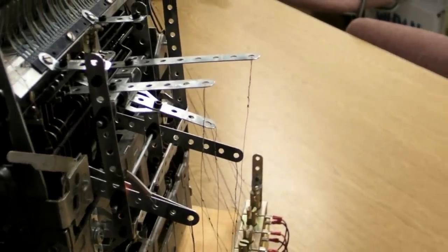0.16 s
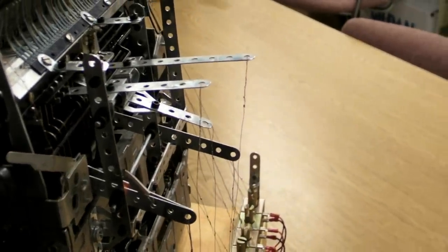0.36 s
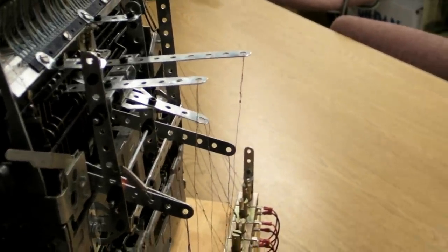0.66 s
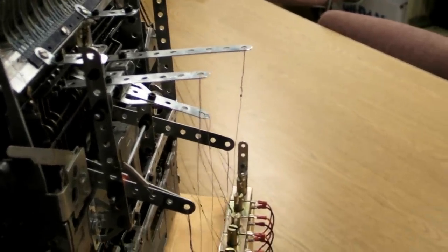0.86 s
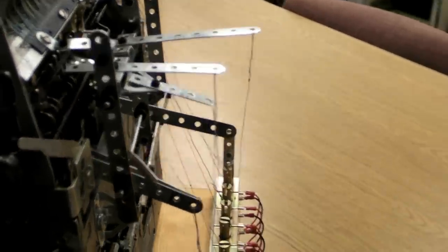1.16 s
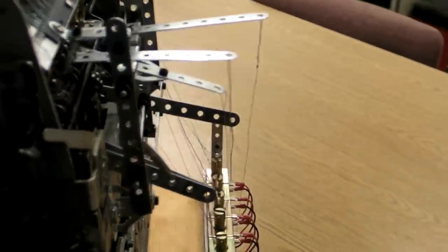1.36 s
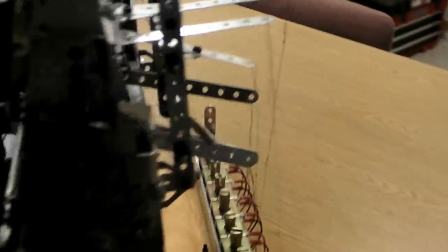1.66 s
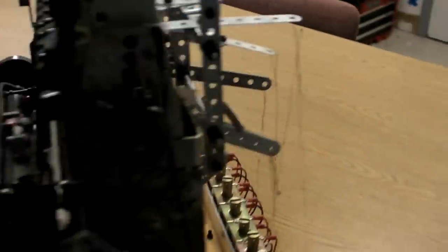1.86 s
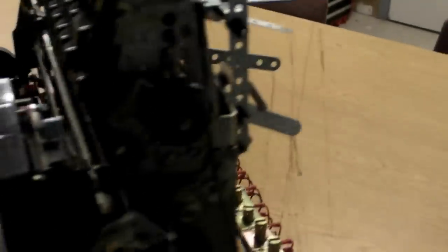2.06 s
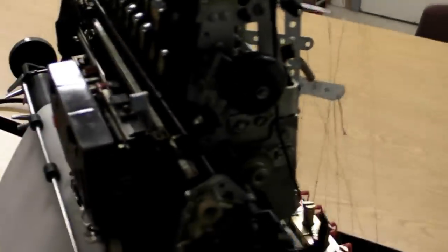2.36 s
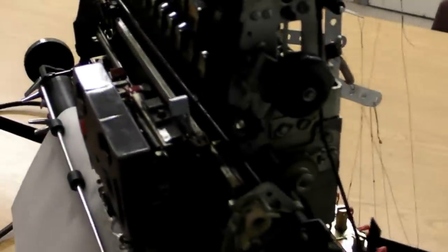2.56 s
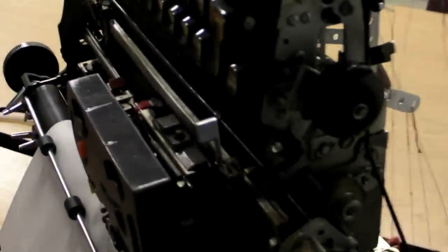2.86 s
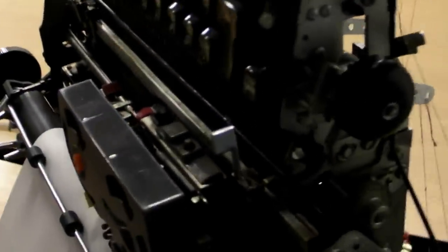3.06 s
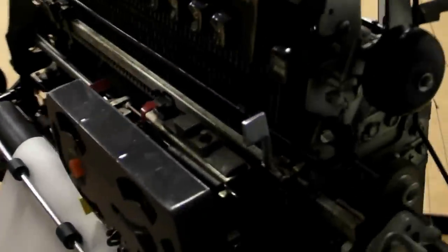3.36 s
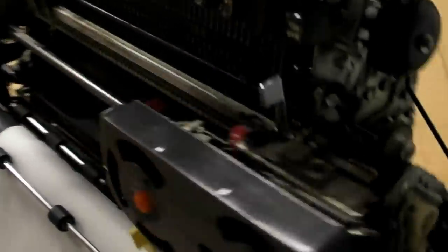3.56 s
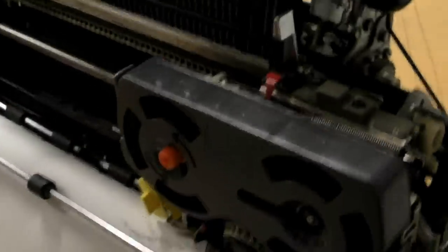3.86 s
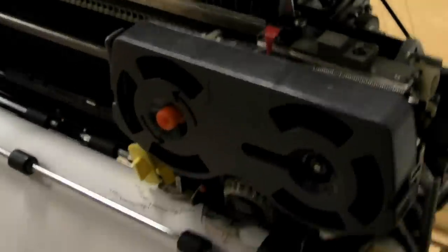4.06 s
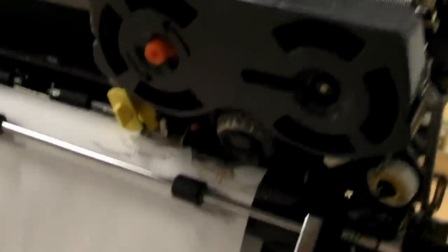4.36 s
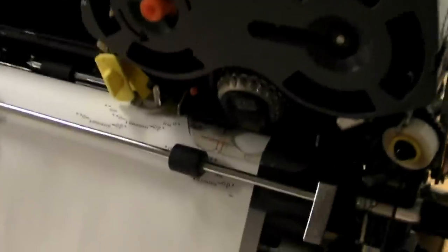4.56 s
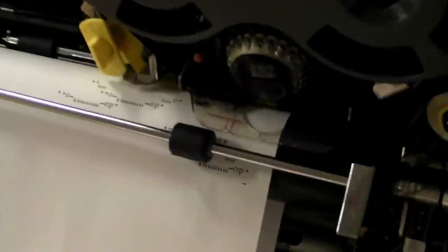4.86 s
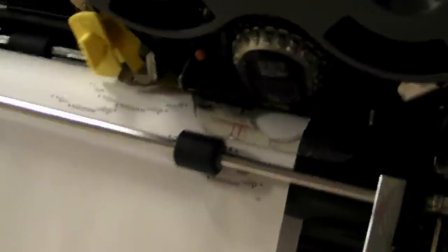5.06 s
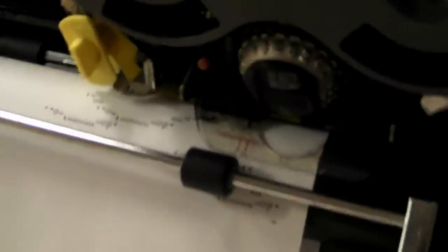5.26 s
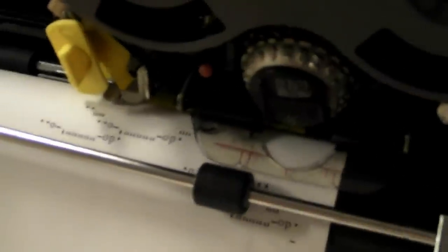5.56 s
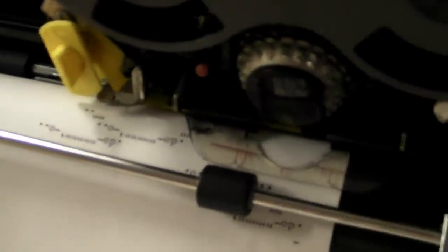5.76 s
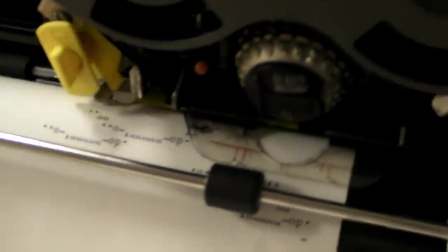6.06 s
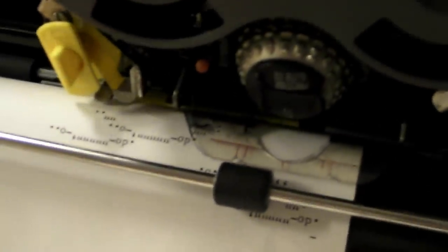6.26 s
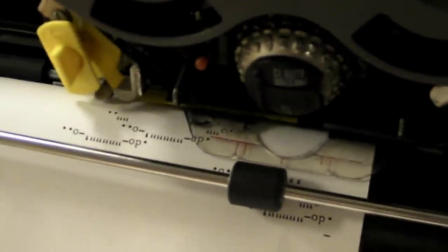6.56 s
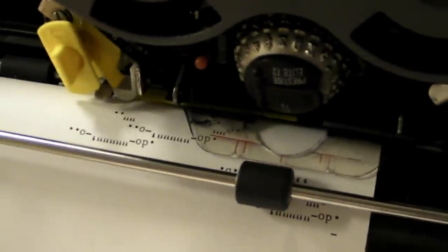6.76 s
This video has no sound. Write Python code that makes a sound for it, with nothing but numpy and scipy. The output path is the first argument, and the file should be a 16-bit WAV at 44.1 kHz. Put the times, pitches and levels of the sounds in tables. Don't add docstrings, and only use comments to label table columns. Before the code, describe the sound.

Hand-held close microphones begin beside a typewriter's metal levers and move round to its print head. Bright latch snaps and type blows repeat evenly, give way to irregular letters with clattering levers, then stop. A small motor hums and ticks, the carriage bangs home, and rapid regular typing resumes, harder and more ringing, over a faint table boom and short room tail.

```python
import sys
import numpy as np
from scipy import signal
from scipy.fft import rfft, irfft, next_fast_len
from scipy.io import wavfile
from scipy.ndimage import uniform_filter1d

SR = 44100
rng = np.random.default_rng(int(sys.argv[2]) if len(sys.argv) > 2 else 0)


def attenuation_scalar(level_db):
    decades = np.asarray(level_db, float) / 20
    return 10 ** decades


def int16_out(signal):
    q = np.round(np.clip(np.atleast_2d(signal).T, -1, 1) * 32767)
    wavfile.write(sys.argv[1], SR, q.astype(np.int16))


N = 305172
SIZE = next_fast_len(N + SR)
HZ = np.arange(SIZE // 2 + 1) * SR / SIZE + 1e-3
T = np.arange(N) / SR
TC = T[::64]
ARRIVE_S = 4.6


def level(x, db):
    return x * attenuation_scalar(db) / np.sqrt(np.mean(x ** 2))


def shape(table):
    hz, db = np.transpose(table)
    return attenuation_scalar(np.interp(np.log(HZ), np.log(hz), db))


def modes(table):
    return sum(attenuation_scalar(db) * 1j * HZ * w / (f ** 2 - HZ ** 2 + 1j * HZ * w) for f, w, db in table)


def through(x, gain):
    return irfft(rfft(x, SIZE) * gain, SIZE)[..., :N]


def add_at(out, start_s, sound):
    i = int(start_s * SR)
    out[..., i:i + sound.shape[-1]] += sound


def spell(start_s, end_s, rise_db_s, fall_db_s):
    return -rise_db_s * np.maximum(start_s - TC, 0) - fall_db_s * np.maximum(TC - end_s, 0)


def toned(table, low_db, high_db):
    return [(s, db, low_db - bright, high_db + bright, *rest) for s, db, bright, *rest in table]


def contacts(table, rise_ms, fall_ms, tail_db, tail_ms, gains_db, alike, click):
    lead = 512
    t = (np.arange(4096) - lead) / SR * 1000
    after = np.maximum(t, 0)
    crack = np.exp(-after / fall_ms) * (1 - attenuation_scalar(tail_db))
    buzz = attenuation_scalar(tail_db) * np.exp(-after / tail_ms)
    swing = np.where(t < 0, np.exp(t / rise_ms), crack + buzz)
    habit = rng.standard_normal(len(t))
    force = np.zeros((3, N + len(t)))
    for s, db, low, high, *_ in table:
        chance = np.sqrt(1 - alike ** 2) * rng.standard_normal(len(t))
        burst = swing * (click * (t == 0) + alike * habit + chance)
        gains = attenuation_scalar(db + np.add(gains_db, [low, 0, high]))
        add_at(force, s, gains[:, None] * burst)
    return force[:, lead:N + lead]


def grains(rate, spread_db, ms):
    size_db = spread_db * np.minimum(rng.exponential(size=N), 3)
    hit = (rng.random(N) < rate / SR) * attenuation_scalar(size_db)
    swell = signal.lfilter([1], [1, -np.exp(-1000 / (ms * SR))], hit)
    return level(rng.standard_normal(N) * swell, 0)


# time in seconds, peak in dB, brightness in dB.
REPEAT_SNAPS = [
    (0.0257, -5.5, 4),
    (0.2213, -5.5, 4.5),
    (0.4256, -4.5, 5.5),
    (0.6255, -5.5, 5),
]
LETTER_SNAPS = [
    (1.2944, -8.5, 8.7),
    (2.0205, -9.5, 4),
    (2.4445, -10, 5.5),
    (2.8694, -9.5, 2),
]
RESET_SNAPS = [
    (2.2522, -7.5, 5),
    (2.6764, -2, 3),
    (3.1085, -6.5, 1),
    (3.4552, -17.5, 15),
]
# mode in Hz, width in Hz, level in dB.
LATCH_BODY = [(830, 60, -6), (1580, 120, -4), (2510, 60, -2), (3400, 600, 12), (4700, 500, 8),
              (5900, 500, 5), (7670, 200, 2)]


def latch_snaps():
    hits = toned(REPEAT_SNAPS + LETTER_SNAPS + RESET_SNAPS, 6.5, -1.1)
    force = contacts(hits, rise_ms=0.3, fall_ms=1.1, tail_db=-21, tail_ms=45.0,
                     gains_db=[-9.0, -9.5, -6.0], alike=0.8, click=8)
    return [(force, LATCH_BODY)]


# time in seconds, peak in dB, brightness in dB.
STOP_SNAPS = [
    (4.1695, -3, 1),
    (4.2435, -14, -10),
]
FRONT_SNAPS = [(4.726, -5.5, 0.87), (4.9237, -4.5, 1.1), (5.1249, -5, 0.7), (5.3201, -5, 1.3),
               (5.5252, -4.5, 0.25), (5.7246, -5.5, -0.87), (5.9233, -4.5, -0.33), (6.1247, -4, -0.2),
               (6.325, -5, -1.5), (6.5249, -5.5, 0.81), (6.7252, -5, -0.62)]
# mode in Hz, width in Hz, level in dB.
CARRIAGE_BODY = [(856, 90, 5), (1090, 90, 4), (1420, 160, 4), (1750, 160, 3)]
FRONT_BODY = [(840, 60, 0), (1085, 100, 9), (1550, 180, 7), (1930, 120, 1), (2500, 90, 3), (2655, 45, 11),
              (7000, 700, 3)]


def stop_and_front_snaps():
    hits = toned(STOP_SNAPS + FRONT_SNAPS, -5.5, -5.0)
    force = contacts(hits, rise_ms=0.3, fall_ms=1.1, tail_db=-12.0, tail_ms=21.3,
                     gains_db=[-6.5, -6.0, -6.0], alike=0.8, click=8)
    front = T > ARRIVE_S
    return [(force * front, FRONT_BODY), (force * ~front, CARRIAGE_BODY)]


# time in seconds, peak in dB, pitch in Hz of the cam knock before.
FRONT_BLOWS = [(4.789, -15, 7500), (4.9907, -15, 1470), (5.1931, -15, 7600), (5.3828, -14.5, 1540),
               (5.5854, -15.5, 2950), (5.7871, -15, 4820), (5.9915, -15, 4720), (6.1933, -14.5, 2810),
               (6.3847, -15.5, 3070), (6.587, -16, 3200), (6.7907, -15, 3150)]
# mode in Hz, width in Hz, level in dB.
TYPE_BODY = [(1020, 130, 2), (3050, 260, 10), (5740, 400, 3), (6300, 400, 6)]


def type_blows():
    hits = [(s, db, -14.0, -3.0) for s, db, _ in FRONT_BLOWS]
    force = contacts(hits, rise_ms=0.34, fall_ms=1.0, tail_db=-0.5, tail_ms=7.0,
                     gains_db=[-4.0, -6.0, -3.0], alike=0.8, click=5.5)
    return [(force, TYPE_BODY)]


# time in seconds, peak in dB, brightness in dB.
RELEASES = [
    (0.8008, -5.5, 2),
    (1.5265, -9, 1.5),
]
# mode in Hz, width in Hz, level in dB.
CATCH_BODY = [(7000, 1500, 6.4), (8400, 1400, 14.6), (13500, 2800, 2.1)]


def catch_releases():
    bounce_s, bounce_db = 0.016, -8
    bounces = [(s + bounce_s, db + bounce_db, bright) for s, db, bright in RELEASES]
    hits = toned(RELEASES + bounces, 0.5, -1.5)
    force = contacts(hits, rise_ms=0.71, fall_ms=1.6, tail_db=-28.0, tail_ms=22.0,
                     gains_db=[-6.0, -6.0, -5.0], alike=0.38, click=4.0)
    return [(force, CATCH_BODY)]


# time in seconds, peak in dB, cam lead in ms, cam pitch in Hz.
REPEAT_BLOWS = [
    (0.0931, -13, 14.5, 5640),
    (0.2813, -13.5, 9.4, 2840),
    (0.486, -14.5, 13, 4840),
    (0.6886, -14, 11.3, 4080),
]
# time in seconds, peak in dB, pitch in Hz.
LETTER_BLOWS = [
    (1.3839, -10, 7500),
    (2.1223, -11, 3230),
    (2.5304, -11, 7100),
    (2.9521, -10, 2970),
]
# delay in seconds, level against it in dB, brightness in dB, pitch in Hz.
AFTER_REPEAT = [(0.016, -18, 0, 2460)]
AFTER_LETTER = [(0.033, -2.5, -4.5, 4070)]
AFTER_LETTER_BLOW = [(0.022, -8, 6.6, 3150)]
AROUND_FRONT = [(-0.02, -19.5, 2.2, 2380), (0.0155, -15, 8.8, 2640), (0.111, -41, 5, 2570)]
# time in seconds, #
# peak in dB, brightness in dB, pitch in Hz.
LEVERS = [(0.8364, -18, -8, 2950), (0.8752, -11.5, -11, 3330), (1.351, -13.5, -2, 5400),
          (1.401, -17, -2.5, 2870), (1.4582, -14, -7, 2790), (1.5617, -21, -10, 6040),
          (1.5852, -15.5, -4, 3200), (1.6006, -14, -8.5, 3300), (2.0665, -19, -5, 3090),
          (2.076, -18, -4, 3100), (2.0846, -21.5, 7, 5030), (2.105, -15, 5, 3900), (2.1144, -15, 8, 3380),
          (2.1905, -12.5, -5, 2790), (2.2479, -16.5, 5.5, 1680), (2.2834, -16.5, -12.5, 1760),
          (2.4934, -15.5, 2, 3330), (2.5476, -17.5, 11, 3220), (2.9188, -13.5, -2.1, 3170),
          (2.9262, -24, 10, 3640), (2.9593, -31, 9, 7180), (3.1498, -16.5, 3, 5900), (3.1557, -26, 3, 3400),
          (3.23, -15.5, -1.5, 3160), (3.238, -18, -7, 2470), (3.2617, -14, 8, 6100),
          (3.2705, -25, -10, 5900), (3.3014, -16.5, -12, 2280), (3.45, -11.5, 4.5, 4660)]
RETURN = [
    (3.7052, -36, 7.5, 7730),
    (3.8124, -40.5, 16, 3000),
    (3.9542, -42, 19, 3000),
    (4.051, -33.5, -16, 2040),
    (4.068, -20.5, 5, 3220),
    (4.0787, -17, -4.5, 2940),
    (4.188, -24.5, -18, 1610),
    (4.2131, -18.5, -2.5, 3500),
    (4.2638, -22, -14.5, 1340),
    (4.7407, -30, 9, 2660),
]


def knocks():
    pairs = [(REPEAT_SNAPS, AFTER_REPEAT), (LETTER_SNAPS, AFTER_LETTER),
             (LETTER_BLOWS, AFTER_LETTER_BLOW), (FRONT_SNAPS, AROUND_FRONT)]
    rows = []
    for events, rule in pairs:
        for delay, db, bright, hz in rule:
            rows += [(e[0] + delay, e[1] + db, bright, hz) for e in events]
    rows += [(s - 0.0088, db + 2.5, 4, hz) for s, db, hz in FRONT_BLOWS]
    rows += [(s - lead_ms / 1000, db - 1.5, 5.5, hz) for s, db, lead_ms, hz in REPEAT_BLOWS]
    rows += [(s, db, -3.0, 5900) for s, db, *_ in REPEAT_BLOWS]
    rows += [(s, db, 1.5, hz) for s, db, hz in LETTER_BLOWS]
    return toned(rows + LEVERS + RETURN, -8.5, -3.0)


# start in seconds, end in seconds, rattle in dB, air-band part in dB.
MOTION = [
    (0.0, 0.99, -22.5, -5),
    (1.42, 1.681, -16, -5),
    (2.103, 3.49, -17.5, -6),
    (4.118, 4.28, -48, -5),
    (4.72, 7.0, -23.5, -2.5),
]


def rattle():
    start_db_s, settle_db_s, dull_db_s, rest_db = 296, 140, 62, -35.5
    chatter = grains(2600, 5.5, 1.6) * attenuation_scalar(-16)
    body, air = attenuation_scalar(rest_db), attenuation_scalar(rest_db - 4.5)
    for start, end, db, air_db in MOTION:
        body = body + attenuation_scalar(db + spell(start, end, start_db_s, settle_db_s))
        air = air + attenuation_scalar(db + air_db + spell(start, end, start_db_s, settle_db_s + dull_db_s))
    drive = 0
    for snaps, blows, db in [(REPEAT_SNAPS, REPEAT_BLOWS, -15), (FRONT_SNAPS, FRONT_BLOWS, -18)]:
        for snap, blow in zip(snaps, blows):
            drive = drive + attenuation_scalar(db + spell(blow[0], blow[0], 94, 216)) * (TC > snap[0])
    body = np.interp(T, TC, body + drive)
    air = np.interp(T, TC, air + attenuation_scalar(-0.5) * drive)
    return np.array([body, body, air]) * chatter


# mode in Hz, width in Hz,
# level in dB.
BACK_BODY = [(913, 18, -14.5), (1610, 15, -75), (2490, 22, -14), (3300, 1300, -3), (4750, 110, -16),
             (6300, 53, -46), (7480, 480, 1)]
SPRING_BODY = [(2500, 50, 3), (2655, 40, 9)]


def loose_parts():
    force = rattle() + contacts(knocks(), rise_ms=1.7, fall_ms=2.4, tail_db=-1.5, tail_ms=16.6,
                                gains_db=[-4.0, -4.0, -4.0], alike=0.31, click=2.0)
    front = T > ARRIVE_S
    return [(force * ~front, BACK_BODY), (force * front, SPRING_BODY)]


# frequency in Hz, density in dB per Hz.
METAL = [(180, -18), (300, -1.5), (343, -2.5), (463, -5.5), (860, -1.5), (1350, -3.5), (2590, 1), (5780, 4),
         (8080, -2), (11900, -4.5), (14000, 0.5), (15500, -7.5), (16300, -52)]


def steel(jobs):
    low = 1 / (1 + (HZ / 1800) ** 6)
    high = 1 / (1 + (8500 / HZ) ** 12)
    bands = shape(METAL) * np.array([low, 1 - low - high, high])
    bands /= np.sqrt(np.mean(bands ** 2, axis=1, keepdims=True))
    total = 0
    for force, body in jobs:
        total = total + np.sum(rfft(force, SIZE) * bands, axis=0) * (1 + modes(body))
    return irfft(total, SIZE)[:N]


# time in seconds, level in dB, pitch in Hz, ring in ms.
TWANG = (4.696, -15, 2510, 14)


def rings():
    t, out = np.arange(4096) / SR, np.zeros(N + 4096)
    rise_ms, ring_ms = 1.0, 4
    rows = [(s - 0.0015, db + 1.5, hz, ring_ms) for s, db, _, _, hz in knocks()]
    for s, db, hz, ms in rows + [TWANG]:
        swell = (1 - np.exp(-1000 * t / rise_ms)) * np.exp(-1000 * t / ms)
        add_at(out, s, attenuation_scalar(db) * swell * np.sin(2 * np.pi * hz * t))
    return out[:N]


# mode in Hz, width in Hz, level in dB.
TABLE_BODY = [(149.3, 8.8, 9.5), (186.8, 23.7, 5.5), (209.4, 4.7, -3.5), (256.7, 4.6, -11), (347, 10, 0.5)]
# start in seconds, end in seconds, level in dB, lowest mode in dB.
SHAKING = [
    (0.0, 0.92, -36.5, -42.5),
    (4.76, 7.0, -33.5, -42),
]
# time in seconds, shaking in dB, lowest mode in dB, ringing pitch in Hz.
THUMPS = [
    (0.5, -33, -44, 224),
    (0.839, -26.5, -43, 150.6),
    (1.392, -27, -46, 160.5),
    (1.572, -28.5, -59, 148),
    (2.13, -26.5, -40, 217.5),
    (2.542, -24.5, -54, 221),
    (2.968, -24, -49, 198),
    (3.239, -25.5, -50, 193),
    (3.5, -34, -43, 189),
    (4.079, -30.5, -42, 197.5),
]


def boom():
    rows = SHAKING + [(s, s, db, low_db) for s, db, low_db, _ in THUMPS]
    top_gains, low_gains = [], []
    for start, end, db, low_db in rows:
        ramp = spell(start, end, 235, 73.5)
        top_gains.append(attenuation_scalar(db + ramp))
        low_gains.append(attenuation_scalar(low_db + 0.96 * ramp))
    top_gain = np.max(top_gains, axis=0) + attenuation_scalar(-45)
    low_gain = np.max(low_gains, axis=0) + attenuation_scalar(-71)
    top = level(through(grains(600, 0.97, 2.44), modes(TABLE_BODY)), 0)
    leg_modes = modes([(92.8, 3, 0), (40, 45, -40)]) / (1 + (HZ / 125) ** 6)
    legs = level(through(rng.standard_normal(N), leg_modes), 0)
    out = top * np.interp(T, TC, top_gain) + legs * np.interp(T, TC, low_gain)
    t = T[:SR // 2]
    swell = (1 - np.exp(-t / 0.0027)) * np.exp(-t / 0.069)
    for s, db, _, hz in THUMPS:
        add_at(out, s, attenuation_scalar(db + 4) * swell * np.sin(2 * np.pi * hz * t))
    return out


# pitch in Hz, rms level in dB, heard from in seconds, heard to in seconds.
HUM = [(231.5, -45, 0, 7), (446.8, -50, 3.55, 4.08)]
# first tick in seconds, end in seconds, lower ring in dB, upper ring in dB.
TICKS = [
    (1.090, 1.29, -36, -21),
    (1.792, 2.015, -36, -19),
    (3.6140, 4.05, -24, -23),
    (4.3530, 4.70, -27, -28),
]


def motor():
    turn_hz, tick_ms, weak_db = 28.6, 0.05, -55.0
    out, low, high = 0, 0, 0
    for hz, db, start, end in HUM:
        drift = np.cumsum(uniform_filter1d(rng.standard_normal(N), size=2000)) * 0.004
        gain = np.sqrt(2) * attenuation_scalar(db + np.interp(T, TC, spell(start, end, 150, 150)))
        out = out + gain * np.sin(2 * np.pi * hz * T + drift)
    for start, end, low_db, high_db in TICKS:
        ms = (T - start) * turn_hz % 1 / turn_hz * 1000
        half_ms = (ms + 500 / turn_hz) % (1000 / turn_hz)
        tick = np.exp(-ms / tick_ms) + attenuation_scalar(weak_db) * np.exp(-half_ms / tick_ms)
        tick = tick * (T > start) * (T < end)
        low, high = low + attenuation_scalar(low_db) * tick, high + attenuation_scalar(high_db) * tick
    uneven = 10 + 2.5 * rng.standard_normal(N)
    lower = through(low * uneven, modes([(1880, 90, -9), (2990, 120, 1)]))
    upper = through(high * uneven, modes([(4720, 90, 2)]))
    return out + lower + upper


# frequency in Hz, time to fall 60 dB in seconds.
ROOM_T60 = [(300, 0.31), (2000, 0.67), (6000, 0.6), (14000, 0.37)]


def room(x):
    wet_db, gap_s, step_s, count = -7.5, 0.011, 0.11, 4
    t = np.arange(SR - 1) / SR
    hz, t60 = np.transpose(ROOM_T60)
    fades = np.exp(-np.log(1000) * t / t60[:, None]) * (1 - np.exp(-t / gap_s))
    fades /= np.sqrt(np.sum(fades ** 2, axis=1, keepdims=True))
    bands = [np.interp(np.log(HZ), np.log(hz), row) for row in np.eye(len(hz))]
    wet = 0
    for k in range(count):
        share = np.sqrt(np.maximum(1 - np.abs((T / step_s - k + 1) % count - 1), 0))
        echo = rng.standard_normal(len(t))
        path = sum(band * rfft(echo * fade, SIZE) for band, fade in zip(bands, fades))
        wet = wet + rfft(x * share, SIZE) * path
    return attenuation_scalar(wet_db) * irfft(wet, SIZE)[:N]


# frequency in Hz, density in dB per Hz.
QUIET = [(35, -44), (60, -6), (217, 15), (527, -7), (2970, -8.5), (7400, -41), (8120, -38), (13900, -41),
         (16000, -43)]


def room_air():
    return level(through(rng.standard_normal(N), shape(QUIET)), -41)


def machine():
    jobs = latch_snaps() + stop_and_front_snaps() + type_blows() + catch_releases() + loose_parts()
    near = steel(jobs)
    return near + room(near) + rings() + boom() + motor() + room_air()


# frequency in Hz, side minus mid in dB.
SPREAD = [(60, -4), (110, -25), (200, -20.5), (380, -15.5), (700, -14), (1290, -12.5), (2380, -9.5),
          (4400, -4), (8120, -1), (15000, -3)]


def scene():
    mid, other = machine(), machine()
    side = through(other, shape(SPREAD) / (1 + (HZ / 14200) ** 40))
    return np.array([mid + side, mid - side]) * attenuation_scalar([[-0.15], [0.15]])


def low_pass(x):
    return signal.sosfilt(signal.butter(12, 16480, fs=SR, output="sos"), x)


def record(dry):
    dips = 1 - 0.94 / (1 + ((HZ - 8050) / 110) ** 2) - 0.81 / (1 + ((HZ - 12000) / 350) ** 2)
    hiss_band = 1 / (1 + (13000 / HZ) ** 16) / (1 + (HZ / 15800) ** 60)
    hiss = level(through(rng.standard_normal(N), hiss_band), -60)
    mix = through(dry + hiss, dips / (1 + (HZ / 16200) ** 60))
    mix = mix / (1 + np.abs(mix) ** 8) ** (1 / 8)
    return low_pass(mix)


dry = scene()
out = record(dry)
int16_out(out)
```